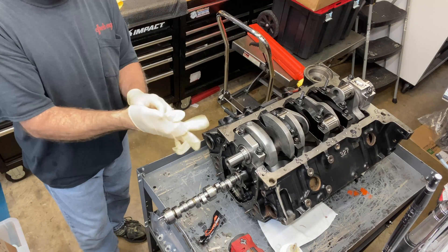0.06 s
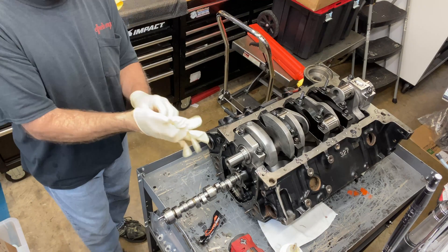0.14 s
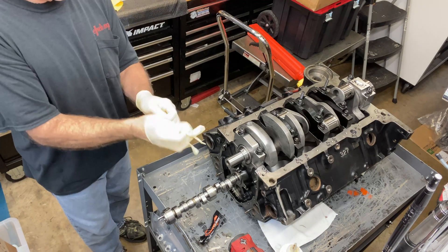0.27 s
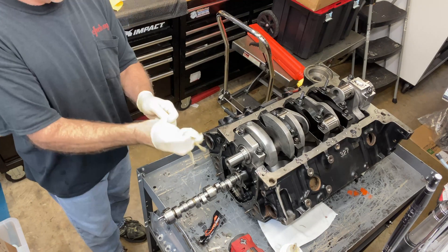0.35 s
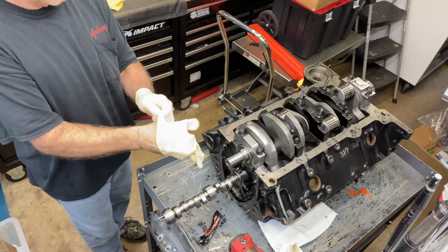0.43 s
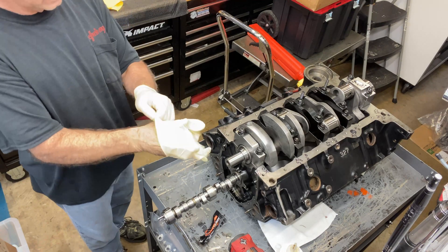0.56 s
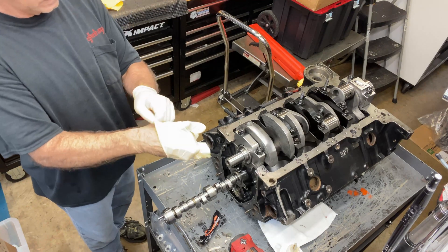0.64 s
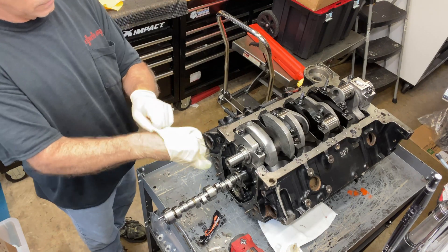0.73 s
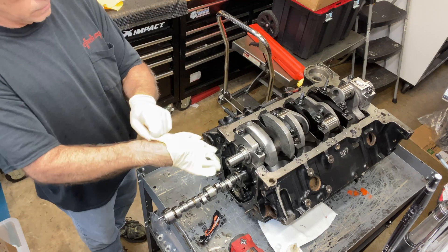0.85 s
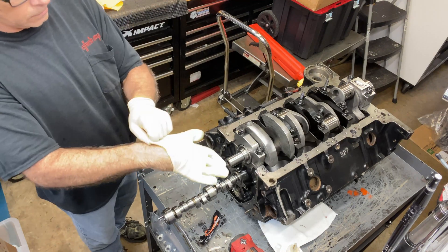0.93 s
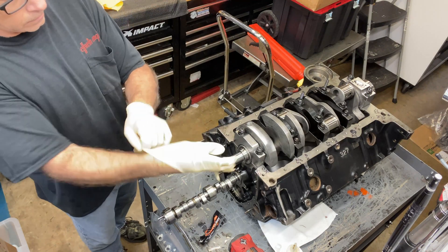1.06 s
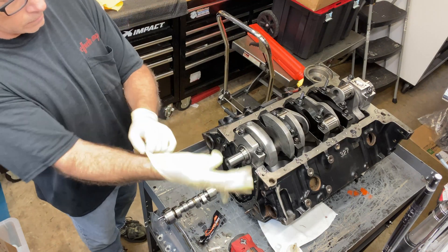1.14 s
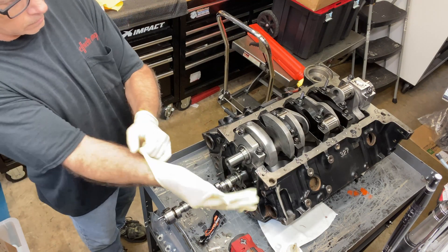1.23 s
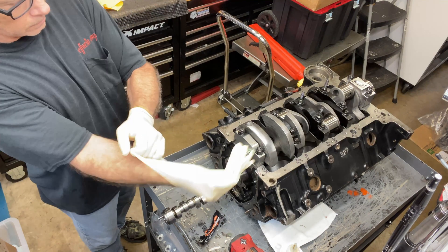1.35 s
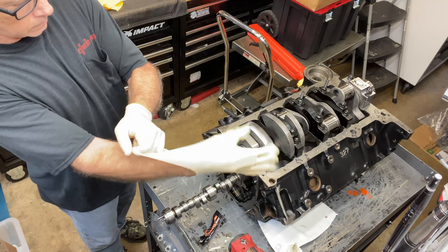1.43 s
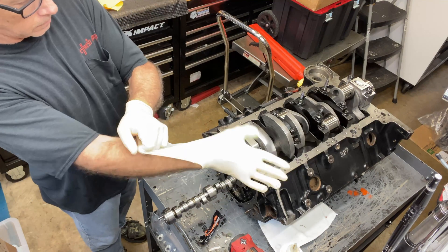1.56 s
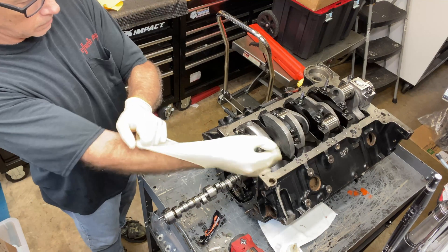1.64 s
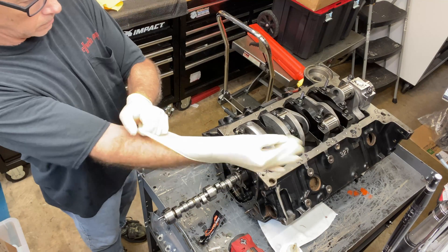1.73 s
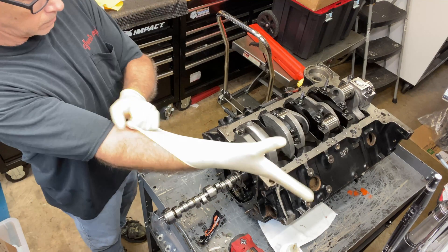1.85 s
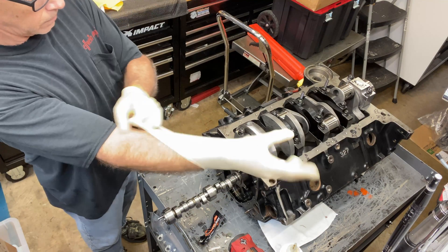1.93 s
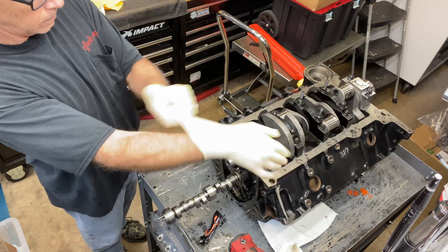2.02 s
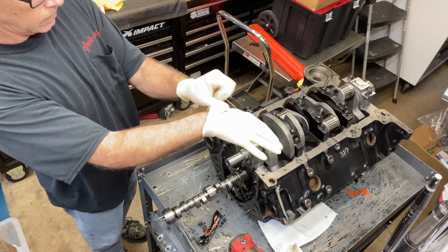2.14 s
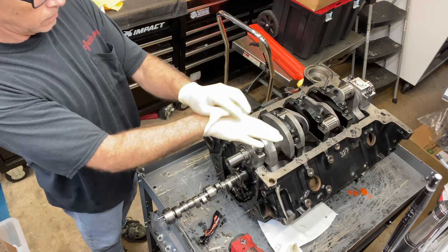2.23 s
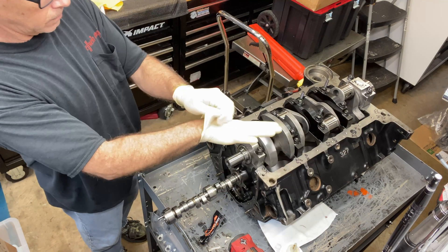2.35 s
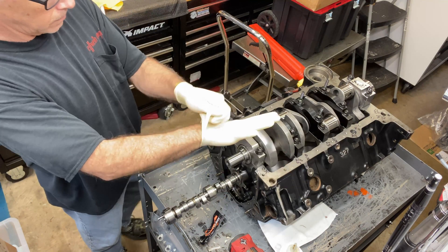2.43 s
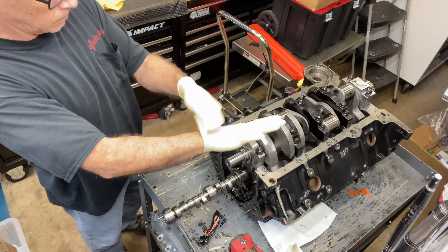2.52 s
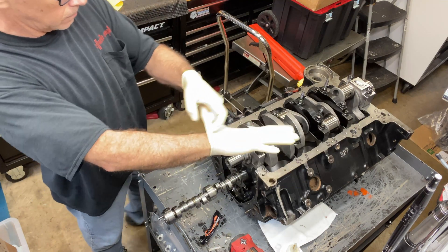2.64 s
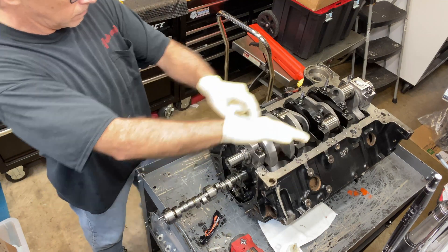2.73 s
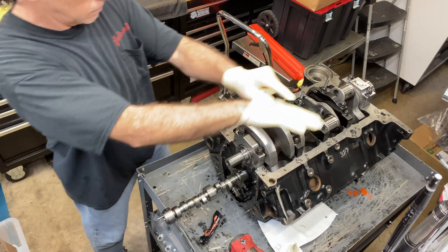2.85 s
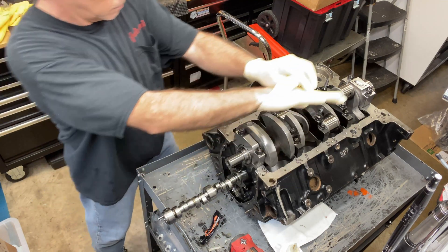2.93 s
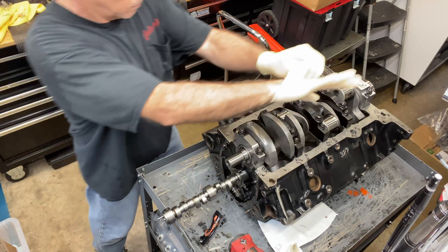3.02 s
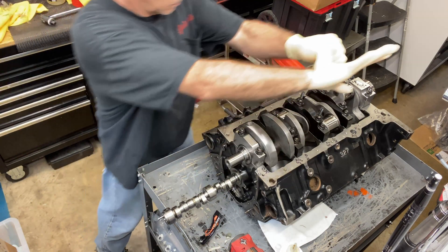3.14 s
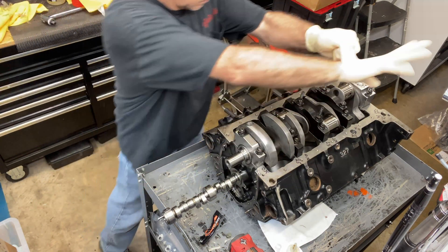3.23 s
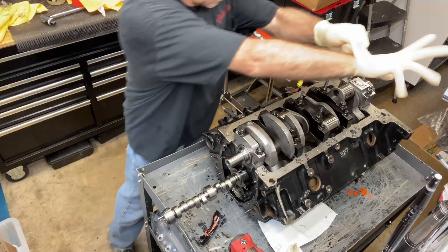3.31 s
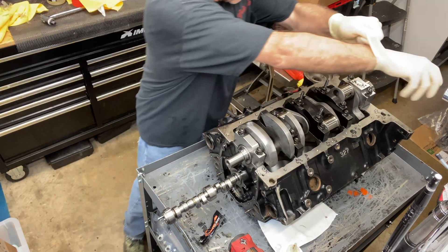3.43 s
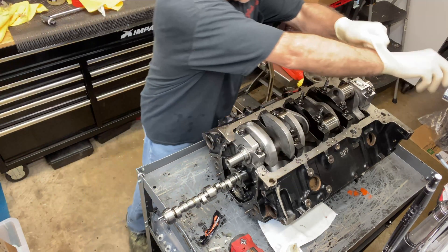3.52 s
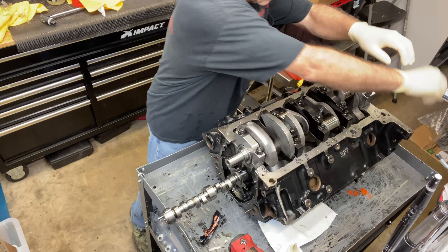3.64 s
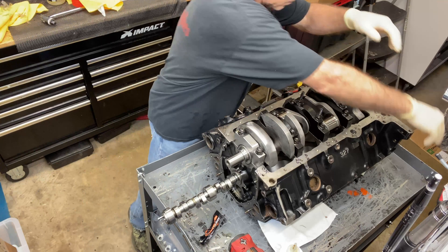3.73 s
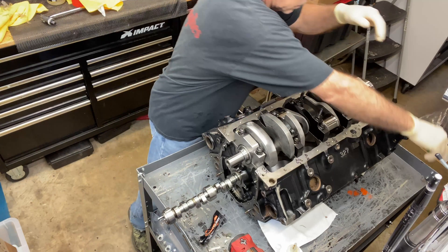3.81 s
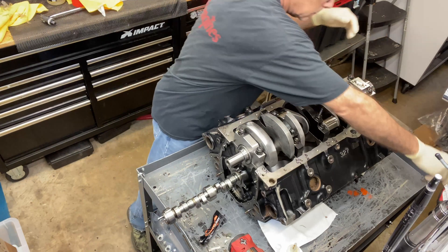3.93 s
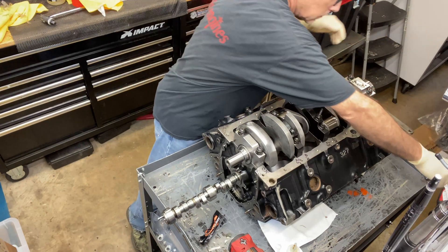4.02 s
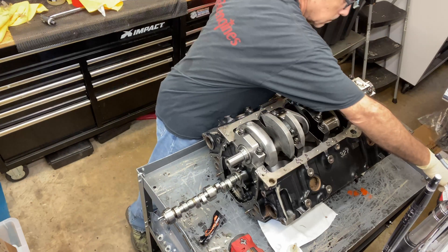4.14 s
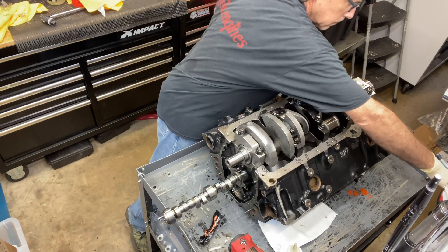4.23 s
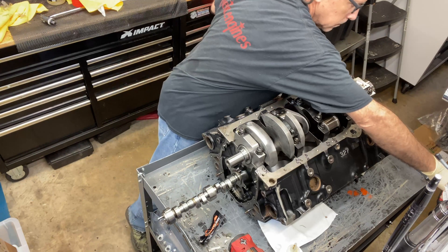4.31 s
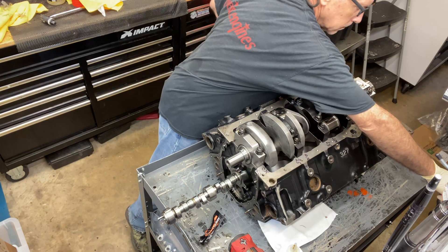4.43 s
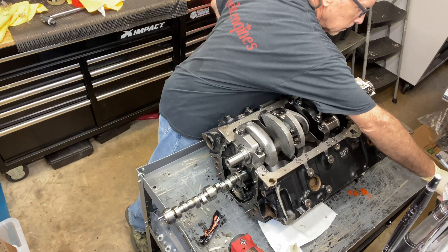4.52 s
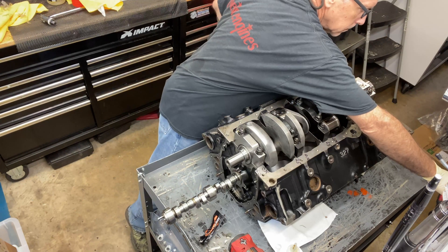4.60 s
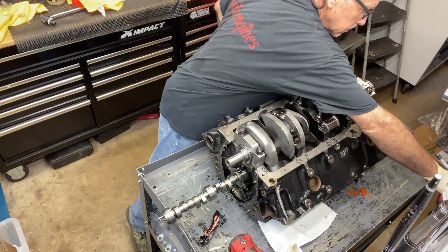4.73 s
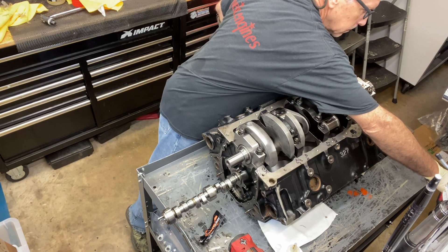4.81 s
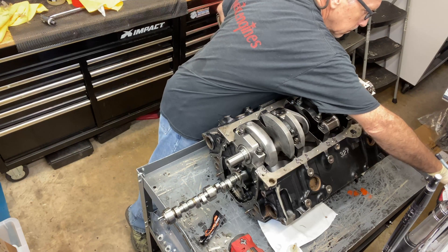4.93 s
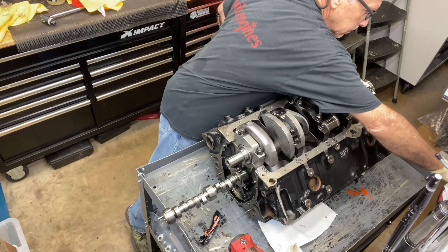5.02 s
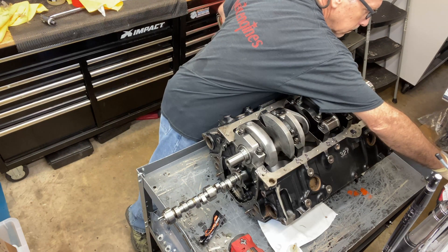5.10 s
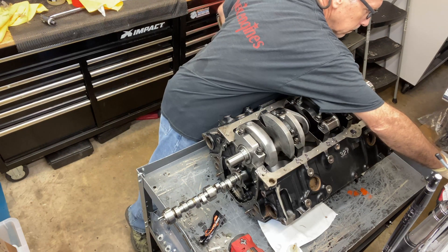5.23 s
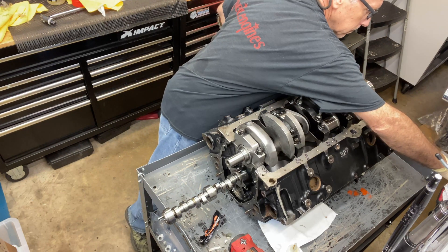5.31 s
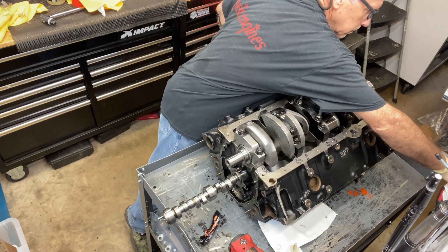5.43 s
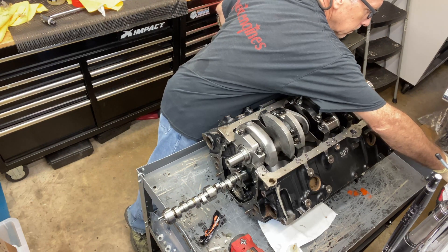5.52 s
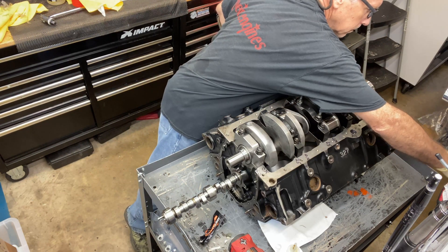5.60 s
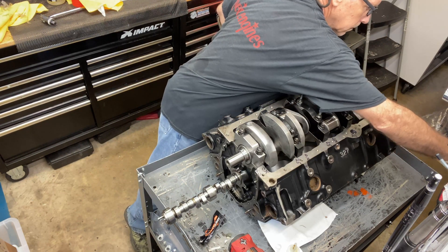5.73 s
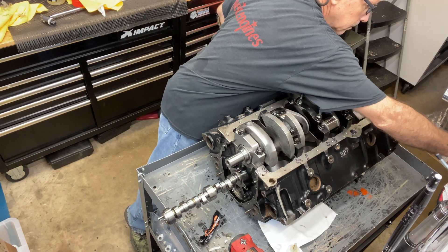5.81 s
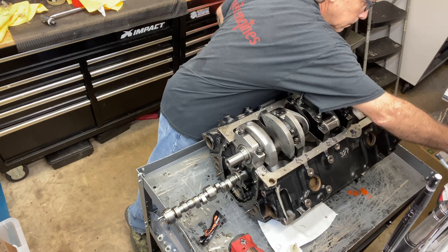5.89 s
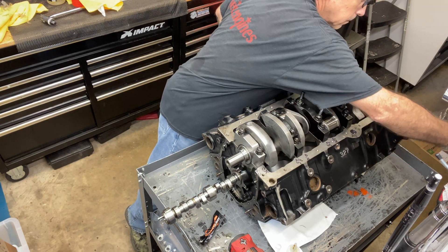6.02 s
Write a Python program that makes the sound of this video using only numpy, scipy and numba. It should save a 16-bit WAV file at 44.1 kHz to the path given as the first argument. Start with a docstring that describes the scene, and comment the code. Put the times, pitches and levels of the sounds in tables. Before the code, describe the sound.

In a small workshop, a latex glove is worked onto a hand close to the microphone: dry rustling, quick fluttering pulls with rubbery rasps, then loud snaps against skin. After the last crisp snap it goes nearly quiet, leaving a low motor hum. Slightly further off, clothes brush softly and parts are shifted with dull bumps, a knock and faint metal ringing.

```python
"""In a small workshop a latex glove is worked onto a hand. Random slips make the film rustle, rasp and squeak.
Falling resonances make it flutter as it is stretched; short noise bursts make it snap on the skin.
Then parts are shifted on a shelf a little further off: noise knocks with light metal rings and dull bumps.
Filtered noise gives the brushing clothes and the room air; under it all a machine hums in three low tones."""
import sys
import numpy as np
from scipy import signal
from scipy.fft import rfft, irfft, next_fast_len
from scipy.io import wavfile
from numba import njit

SR = 44100
rng = np.random.default_rng(int(sys.argv[2]) if len(sys.argv) > 2 else 0)


def unload_audio(sound):
    """Save the sound as a 16-bit wav file, at the path given as the first command line argument."""
    columns = np.transpose(np.atleast_2d(sound))
    # keep every value between -1 and 1, then stretch to whole-number steps
    steps = np.round(np.clip(columns, -1, 1) * 32767)
    wavfile.write(sys.argv[1], SR, steps.astype(np.int16))


N = 267246  # length in samples
T = np.arange(N) / SR  # time in seconds
TOP_HZ = 16300  # upper edge of the whole sound

# All levels in dB are relative settings, ahead of the final mix.
# Pulls on the cuff. Each row: time of full strength in seconds, length in seconds, flutter level in dB,
# rasp level in dB, rub level in dB, swell over the pull in dB, pitch at that time in Hz,
# rise time of the flutter in seconds.
PULLS = [(1.097, 0.088, -26, -60, -39, 7, 460, .055), (1.2685, 0.069, -28.5, -29.5, -40.5, 5.5, 500, .01),
         (1.431, 0.057, -28, -37.5, -46.5, 0, 330.3, .02),
         (1.573, 0.095, -32.5, -37, -39.5, 7.5, 521.2, 0.01013),
         (1.761, 0.1, -40, -45, -46.5, -1, 399, 0.047)]
PULL_RELEASE_S = 0.03


def undb(db):
    """Turn decibels into a gain."""
    return 10 ** (np.asarray(db) / 20)


def unit(x):
    """Scale a sound to an average (rms) strength of 1."""
    return x / np.sqrt(np.mean(x ** 2))


def at(points, hz):
    """Read a curve of (Hz, value) points on a log-frequency axis."""
    point_hz, value = np.transpose(points)
    return np.interp(np.log(hz + 1), np.log(point_hz), value)


def colour(x, points):
    """Filter a sound with a curve of (Hz, dB) points."""
    n = x.shape[-1]
    size = next_fast_len(n)
    gain = undb(at(points, np.fft.rfftfreq(size, 1 / SR)))
    return irfft(rfft(x, size) * gain, size)[..., :n]


def band(x, lo, hi, order=4):
    """Keep only the frequencies between lo and hi, in Hz."""
    sos = signal.butter(order, [lo, min(hi, SR / 2 - 1)], "band", fs=SR, output="sos")
    return signal.sosfilt(sos, x)


def walk(rate):
    """Chance that wanders: random values, rate of them per second, joined by straight lines."""
    return np.interp(T * rate, np.arange(4096), rng.standard_normal(4096))


def add(track, s, sound):
    """Mix a sound into a track at time s in seconds."""
    i = round(s * SR)
    track[..., i:i + sound.shape[-1]] += sound[..., :track.shape[-1] - i]


def slips(rate, spread_db):
    """Random stick-slip clicks, rate of them per second, a few much larger than the rest."""
    happens = rng.random(N) < rate / SR
    sign = rng.choice([-1, 1], N)
    return happens * sign * undb(spread_db * np.minimum(rng.exponential(size=N), 4))


def gesture(s, length, attack, release, swell_db=0):
    """Loudness of one movement: rises until time s, holds or swells for its length, then dies away."""
    rise = np.clip(1 + (T - s) / attack, 0, 1) ** 2
    swell = undb(swell_db * (np.clip((T - s) / length, 0, 1) - 1.5))
    return rise * swell * np.exp(-np.clip((T - s - length) / release, 0, 20))


@njit
def resonate(x, hz, k):
    """A resonance (state-variable band-pass) with a moving centre in Hz and relative width k."""
    y, b, l = np.empty(len(x)), 0., 0.  # output and the two stored states
    for i in range(len(x)):
        g = np.tan(np.pi * hz[i] / SR)
        v = (b + g * (x[i] - l)) / (1 + g * (g + k))
        b, l, y[i] = 2 * v - b, l + 2 * g * v, k * v
    return y


def burst(levels_db, decay, points, spike, ring_hz=2000, ring_db=-30, attack_s=0.000071):
    """A contact: a sharp touch and fading noise, set in three bands; a broad resonance joins the middle one."""
    edges_hz = [70, 850, 6000, 15000]  # band edges in Hz
    t = T[:SR // 2]
    push = rng.standard_normal(len(t)) * np.exp(-t / decay) * (1 - np.exp(-t / attack_s))
    push[SR // 1000] += spike * np.sqrt(decay * SR)
    # keep the timing (phase) of the push, but give it a smooth spectrum
    phase = np.exp(1j * np.angle(rfft(push)))
    even = phase * undb(at(points, np.fft.rfftfreq(len(t), 1 / SR)))
    crack = irfft(even, len(t)) * np.exp(-(t / (10 * decay)) ** 2)
    ring = resonate(crack + 1e-18, np.full(len(t), 1. * ring_hz), 0.35)
    ringing = crack + undb(ring_db) * ring
    layers = zip(levels_db, (crack, ringing, crack), edges_hz, edges_hz[1:])
    shiver = sum(undb(db) * unit(band(x, lo, hi)) for db, x, lo, hi in layers)
    return shiver * np.sqrt(decay * SR / len(t) / 2)  # a longer decay carries more energy


def room(x, near_db, tail_db, lag_s):
    """Direct sound, right side first; quick scatter from the bench; a short diffuse tail; new echoes each call."""
    # Time to die away by 60 dB. Each row: frequency in Hz, time in seconds.
    t60_curve = [(100, 0.1), (500, 0.22), (1500, 0.28), (4000, 0.35), (9000, 0.25), (15000, 0.15)]
    hz, s, noise = signal.stft(rng.standard_normal((3, SR // 3)), SR)
    shared = np.clip(1 - (hz[:, None] / 650) ** 2, 0, 1)  # long waves reach both sides alike
    field = noise[:2] * np.sqrt(1 - shared) + noise[2] * np.sqrt(shared)
    fading = np.exp(-np.log(1000) * s / at(t60_curve, hz)[:, None])
    tail = signal.istft(field * fading)[1]
    t = T[:tail.shape[1]]
    near = unit(signal.istft(field)[1][:, ::-1] * np.exp(-t / 0.012))
    near = band(near, 180, 8800, order=1)  # arms and clothes soak up the top, so the treble stays crisp
    late = unit(tail * np.clip(t / 0.0055, 0, 1))  # the tail fades in over 5.5 ms
    response = (undb(near_db) * near + undb(tail_db) * late) / np.sqrt(len(t))
    direct = np.array([np.pad(x, (round(abs(lag_s) * SR), 0))[:len(x)], x])
    echoes = signal.fftconvolve(x[None], response, axes=1)[:, :len(x)]
    return (direct + echoes) / np.sqrt(1 + undb(2 * near_db) + undb(2 * tail_db))


def moving(x, size=8192):
    """A moving source fades from one place in the room to the next, each with its own echoes."""
    out, window = np.zeros((2, N + size)), signal.windows.hann(size)
    x = np.pad(x, (size // 2, size))
    for i in range(0, N, size // 2):
        piece = np.pad(x[i:i + size] * window, (0, SR // 4))  # space for the echoes to ring out
        add(out, i / SR, room(piece, near_db=-5, tail_db=-6, lag_s=.0001))
    return out[:, size // 2:][:, :N]


def rustle():
    """Tiny slips of latex on skin over a smooth sliding hiss, raised by every stroke and pull."""
    # Colour of the rub. Each row: frequency in Hz, level in dB.
    rub_colour = [(300, -0.5), (450, 4), (900, -5.5), (1600, -0.5), (2600, -1), (4500, -6), (6500, -19),
                  (12500, -30), (15000, -32.5)]
    # Strokes of the fingers over the film. Each row: time of full strength in seconds, length in seconds,
    # level in dB, treble in dB relative to it.
    strokes = [(0, 0.0033, -41.5, 1.5), (.07, 0.11, -49, -7), (.3, 0.029, -48, -4), (.42, 0.096, -46, -6),
               (.68, 0.13, -55, -9), (.93, 0.13, -53.5, -2.5), (1.37, 0.087, -42.5, -7.5),
               (2.0, 0.029, -50.5, 3.5), (2.355, 0.0062, -59, 6.5), (2.79, 0.22, -56.5, -7),
               (3.205, 0.066, -49, -4.5), (3.38, 0.51, -68.5, -2), (4.43, 0.11, -64.5, -18),
               (4.99, 0.27, -70, -17), (5.86, .2, -62, -5)]
    # Light contact between strokes. Each row: start of full strength in seconds, length in seconds.
    handling = [(0, 2.21), (2.38, 1.22)]
    handling_db, handling_treble_db = -55, 1
    stroke_attack_s, stroke_release_s, pull_attack_s = 0.1, 0.014, 0.036

    grain = unit(slips(rate=760, spread_db=2.5)) + 1.0 * rng.standard_normal(N)
    # small folds that pop as the film is rubbed
    crinkle = unit(band(slips(rate=170, spread_db=4.5), 1800, 6200, order=1))
    film = colour(grain * undb(2.0 * walk(70)) + undb(-7) * crinkle, rub_colour)
    body, treble = unit(band(film, 220, 6000)), unit(band(film, 6000, TOP_HZ))

    def rub(db, treble_db):
        return undb(db) * (body + undb(treble_db) * treble)

    out = np.zeros(N)
    for s, length, db, treble_db in strokes + [(*row, handling_db, handling_treble_db) for row in handling]:
        out += rub(db, treble_db) * gesture(s, length, stroke_attack_s, stroke_release_s)
    for s, length, _, _, db, swell_db, *_ in PULLS:
        out += rub(db, treble_db=-1.0) * gesture(s, length, pull_attack_s, PULL_RELEASE_S, swell_db)
    return out


def flutter():
    """Stretched film judders over the knuckles, partly regularly; its lowest membrane modes fall at each pull."""
    # the pitch falls as the hand slides in, down to that of the slack film
    sag_octaves_per_s, slack_hz = 6.5, 195.7
    tone_db, jitter = -4, 0.17  # the regular part of the judder and the scatter of its cycles
    judder = unit(slips(rate=880, spread_db=2.0)) + 0.22 * rng.standard_normal(N)
    hz, effort = np.full(N, 1. * slack_hz), 0
    for s, length, db, _, _, swell_db, pitch, rise in PULLS:
        sag = 2 ** (-sag_octaves_per_s * (T - s))
        hz = np.where(T > s - rise, np.maximum(pitch * sag, slack_hz), hz)
        effort = effort + undb(db) * gesture(s, length, rise, PULL_RELEASE_S, swell_db)
    film = 0
    for ratio, db in [(1, 30.5), (1.6, -5.5), (2.3, -22)]:  # mode as a multiple of the pitch, level in dB
        mode = resonate(resonate(judder, hz * ratio, 0.95), hz * ratio, 0.95)
        film = film + undb(db) * mode
    cycles = np.cumsum(hz * (1 + jitter * walk(300))) / SR
    tone = np.sin(2 * np.pi * cycles) * undb(1.6 * walk(90))
    return unit(unit(film / np.sqrt(hz)) + undb(tone_db) * unit(tone)) * effort


def rasp():
    """Taut latex breaks loose at each pull: an uneven train of slips, with a finer grain between them."""
    slip_hz, jitter, scatter_db, fine_grain_db, attack_s = 129.8, .35, 5.5, -4.5, .004
    gap, size = rng.standard_normal((N // 20, 2)).T
    when = np.cumsum(np.exp(jitter * gap)) * SR / slip_hz
    train = np.bincount(np.minimum(when, N).astype(int), undb(scatter_db * size), N)[:N]
    grain = unit(train) + undb(fine_grain_db) * unit(slips(rate=2100, spread_db=2.5))
    sound = colour(grain, [(300, -16.5), (650, 0.5), (2000, 5.5), (3000, 2.0), (4200, -5.5), (9000, -23)])
    effort = sum(undb(db) * gesture(s, length, attack_s, PULL_RELEASE_S) for s, length, _, db, *_ in PULLS)
    return unit(sound) * effort


def snaps():
    """Pinched film slips from the fingers and slaps the skin, trapping a pocket of air."""
    # Snaps and plucks. Each row: start in seconds, body level in dB, crack level in dB, treble level in dB,
    # decay in seconds, pitch of the slap in Hz.
    snap_rows = [(0.271, -37, -31, -55, 0.00099, 1500), (0.575, -32.5, -32, -44.5, 0.0091, 1520),
                 (1.341, -16.5, -23, -44, 0.0014, 2060), (1.4069, -30, -16, -18.5, 0.00046, 5200),
                 (1.666, -23, -25.5, -33, 0.0049, 2200), (1.819, -17, -26.5, -37, 0.0048, 1200),
                 (1.856, -26, -33, -40, 0.0054, 1100), (2.082, -44.5, -41, -32, 0.016, 4000),
                 (2.103, -14.5, -16, -17.5, 0.0058, 920), (2.1367, -22, -13.5, -16, 0.0012, 2720),
                 (2.214, -59, -24.5, -35, 0.00072, 2470), (2.434, -60, -29.5, -35, 0.0024, 4450),
                 (2.4984, -54, -29, -31.5, 0.002, 2700), (2.5293, -27, -14, -11.5, 0.00078, 2030),
                 (2.6077, -24.5, -14, -16, 0.00082, 1020), (2.8534, -62, -52, -22, 0.00079, 5000),
                 (2.8697, -58, -32, -18.5, 0.00065, 5000), (2.8982, -18.5, -12.5, -18, 0.002, 3020),
                 (3.046, -32, -27.5, -33, 0.0013, 2520), (3.229, -28, -32.5, -56, 0.0032, 1410),
                 (3.6156, -28, -24, -23.5, 0.0089, 3360), (3.6294, -27.5, -15, -30, 0.0027, 3820),
                 (3.6333, -18, -11.5, -15, 0.006, 3560)]
    # Colour of a snap. Each row: frequency in Hz, level in dB.
    snap_colour = [(100, -23.5), (220, -0.5), (400, -4.5), (680, -2), (850, -8.5), (1300, -5), (2000, 3),
                   (3200, 1.5), (5500, -1), (11000, -2), (14500, -7)]
    # Lag of the left side: near zero for early snaps, longer for later ones.
    # Each row: time in seconds, lag in seconds.
    left_lag = [(2.2, .00005), (2.5, .00062)]
    dry_below_s = 0.001  # the briefer a tick is than this, the less it stirs the room
    out = np.zeros((2, N))
    for s, *levels_db, decay, hz in snap_rows:
        slap = burst(levels_db, decay, snap_colour, spike=.2, ring_hz=hz, ring_db=5)
        room_db = 10 * np.log10(min(decay / dry_below_s, 1))
        lag_s = np.interp(s, *np.transpose(left_lag))
        add(out, s, room(slap, near_db=room_db + 2.5, tail_db=room_db - 3.5, lag_s=lag_s))
    return out


def jerks():
    """Taut film jerks over the knuckles: each time a click and a few cycles of the film's own tone."""
    # The loudest jerks. Each row: start in seconds, pitch in Hz, level in dB.
    jerk_rows = [(1.2721, 2040, -10), (1.287, 2310, -17), (1.308, 2900, -14.5), (1.322, 2080, -23),
                 (1.334, 2190, -19), (1.576, 1950, -30), (1.603, 1940, -32), (1.87, 2870, -30)]
    decay_s, click_db = 0.0018, -8
    out, t = np.zeros(N), T[:SR // 20]
    for s, hz, db in jerk_rows:
        click = undb(click_db) * rng.standard_normal(len(t)) * np.exp(-t / 0.00023)
        tone = np.sin(2 * np.pi * hz * t) * np.exp(-t / decay_s)
        add(out, s, undb(db) * (tone + click))
    return room(out, near_db=-2.0, tail_db=-6, lag_s=.0001)


def wobbles():
    """The freed cuff rings against the wrist, with a short overtone; its pitch sags as the tension goes."""
    # Each row: start in seconds, pitch it settles to in Hz, level in dB, decay in seconds.
    wobble_rows = [(0.579, 195, -37, 0.018), (1.438, 198, -22.5, 0.021), (1.472, 184.5, -22, 0.029),
                   (1.822, 163, -22, 0.023), (2.1057, 224, -17, 0.014), (2.144, 228, -17, 0.013),
                   (3.058, 184, -35.5, 0.032)]
    overtone_ratio, overtone_db, overtone_decay_s = 2.8, -12, 0.011
    out, t = np.zeros(N), T[:SR // 3]
    for s, pitch, db, decay in wobble_rows:
        sagging_hz = pitch * (1 + 0.08 * np.exp(-t / 0.0166))
        phase = 2 * np.pi * np.cumsum(sagging_hz) / SR
        overtone = undb(overtone_db) * np.sin(overtone_ratio * phase) * np.exp(-t / overtone_decay_s)
        add(out, s, undb(db) * (np.sin(phase) * np.exp(-t / decay) + overtone))
    return out


def squeaks():
    """The glove drags faintly on skin and metal and sings a wavering, gliding note."""
    # Each row: time of full strength in seconds, length in seconds, pitch at that time in Hz,
    # glide in octaves per second, level in dB.
    squeak_rows = [(0.282, 0.031, 1620, -3, -49), (4.441, 0.076, 9800, 2, -70),
                   (4.889, 0.019, 1024, -3.5, -56), (5.198, .016, 3820, 1.5, -53.5)]
    attack_s, release_s = 0.017, 0.012
    out, waver = 0, 1 + .024 * walk(600)
    for s, length, hz, glide, db in squeak_rows:
        pitch = hz * waver * 2 ** (glide * np.clip(T - s, -attack_s, length + release_s))
        note = np.sin(2 * np.pi * np.cumsum(pitch) / SR)
        out = out + undb(db) * note * gesture(s, length, attack_s, release_s)
    return out


def tray(x):
    """The steel tray under the hands rings in sympathy at its narrow resonances."""
    # Each row: frequency in Hz, width in Hz, level in dB.
    tray_modes = [(398, 48, -3), (590, 16, -3), (990, 34, 0)]

    def ring(side):
        return sum(undb(db) * resonate(side, np.full(N, 1. * hz), width / hz) for hz, width, db in tray_modes)

    return x + np.array([ring(side) for side in x])


def parts():
    """Parts bump on the shelf; each contact rings the metal with a new mix of its modes."""
    # Each row: start in seconds, thud level in dB, clack level in dB, tick level in dB, metal ring level in dB.
    part_rows = [(5.288, -66, -50, -60, -56), (5.396, -38, -35.5, -75, -58),
                 (5.411, -36.5, -35.5, -61, -54), (5.557, -74, -44, -64, -49.5),
                 (5.612, -31, -23.5, -27.5, -58), (5.624, -28, -21.5, -56, -50),
                 (5.644, -22, -36, -51, -43), (5.843, -40, -40, -59, -47.5), (5.889, -56, -48, -58, -45.5),
                 (6.002, -56, -49, -53.5, -47)]
    # Ringing modes of the metal. Each row: frequency in Hz, level in dB, time to die by 60 dB in seconds.
    part_modes = [(2450, 5, 0.066), (2724, 6.5, 0.11), (3830, -3, 0.053), (4640, -8, 0.026),
                  (5100, 5.5, 0.067), (8400, -2, .12), (11600, -1, 0.16), (13300, 1, 0.11)]
    # Colour of a knock. Each row: frequency in Hz, level in dB.
    knock_colour = [(80, 2), (200, 9), (450, 6), (800, -3.5), (1300, -3.5), (2200, -7.5), (4000, -15),
                    (6000, -17), (10000, -7), (13000, -22), (15000, -8)]
    out, t = np.zeros((2, N)), T[:SR // 2]
    hz, mode_db, t60 = np.transpose(part_modes)[:, :, None]
    for s, *levels_db, ring_db in part_rows:
        # loose parts keep chattering, which roughens the ring of the lower modes most
        chatter = 1300 / hz * np.cumsum(rng.standard_normal((len(hz), len(t))), axis=1)
        share = undb(mode_db + 2 * rng.standard_normal(hz.shape))
        modes = share * np.sin(2 * np.pi * hz * t + chatter) * np.exp(-np.log(1000) * t / t60)
        ring = undb(ring_db) * modes.sum(axis=0) / np.sqrt(len(hz))
        knock = burst(levels_db, 0.0063, knock_colour, spike=0.2, ring_db=-6, attack_s=0.0011)
        add(out, s, room(knock + ring, near_db=1.5, tail_db=3.0, lag_s=0.00029))
    return out


def bumps():
    """Something blunt bumps the shelf: a boom, a hollow knock and a rough clack, coloured by where it touches."""
    # Each row: start in seconds, boom level in dB, knock level in dB, clack pitch in Hz, clack level in dB.
    bump_rows = [(4.607, -47, -46, 1000, -49.5), (4.981, -60, -52, 1240, -53),
                 (5.046, -46, -46.5, 1020, -49.5), (5.144, -32.5, -44.5, 1720, -51.5),
                 (5.502, -38, -52, 1310, -43.5), (5.735, -36.5, -34.5, 1330, -40),
                 (5.951, -42, -43, 1390, -41), (5.978, -37, -44, 910, -42)]
    boom_hz, boom_decay_s = 205.5, 0.022
    knock_hz, knock_decay_s, clack_decay_s = 511, 0.0092, 0.0078
    out, t = np.zeros((2, N)), T[:SR // 2]

    def mode(hz, db, decay):
        return undb(db) * np.sin(2 * np.pi * hz * t) * np.exp(-t / decay)

    for s, boom_db, knock_db, clack_hz, clack_db in bump_rows:
        rough = unit(resonate(rng.standard_normal(len(t)), np.full(len(t), 1. * clack_hz), 0.2))
        clack = undb(clack_db) * rough * np.exp(-t / clack_decay_s)
        bump = mode(boom_hz, boom_db, boom_decay_s) + mode(knock_hz, knock_db, knock_decay_s) + clack
        add(out, s, room(bump, near_db=0, tail_db=-0.5, lag_s=0.00044))
    return out


def cloth():
    """Soft, dull brushing as the body leans over the bench, with grainy scuffs where the hand drags."""
    # Each row: time of full strength in seconds, length in seconds, cloth level in dB, scuff level in dB.
    brush_rows = [(4.598, 0.057, -58.5, -55), (4.982, 0.2, -53, -54.5), (5.477, .047, -56, -44.5),
                  (5.7, 0.017, -43, -41.5), (5.87, 0.049, -51.5, -54)]
    # Colours of cloth and scuff. Each row: frequency in Hz, level in dB.
    cloth_colour = [(40, -24), (85, 23), (130, -9), (220, 18), (340, 1), (800, -5.5), (1300, -22),
                    (2000, -22), (4000, -42), (10000, -55)]
    scuff_colour = [(300, 4.5), (700, -5), (1250, -4.5), (1800, -17.5), (4000, -23), (10000, -41)]
    attack_s, release_s = 0.025, 0.064
    brush = colour(rng.standard_normal(N) * undb(5.4 * walk(55)), cloth_colour)
    brush = brush / np.std(band(brush, 290, 8000))
    scuff = unit(colour(slips(rate=760, spread_db=2.5), scuff_colour))
    out = np.zeros(N)
    for s, length, db, scuff_db in brush_rows:
        out += (undb(db) * brush + undb(scuff_db) * scuff) * gesture(s, length, attack_s, release_s)
    return out


def machine():
    """A motor hum of almost steady tones in softly wavering room noise."""
    # Tones of the hum. Each row: frequency in Hz, level in dB.
    hum_tones = [(72, -48), (144, -54.5), (179, -57)]
    # Colour of the room noise. Each row: frequency in Hz, level in dB per Hz.
    air_colour = [(25, -41), (50, -18), (75, -12), (105, -20), (150, -21), (220, -17.5), (290, -30),
                  (600, -36), (1100, -40), (2000, -50.5), (4200, -58.5), (7000, -63.5), (15000, -77.5)]
    mid, side = colour(rng.standard_normal((2, N)), air_colour)
    wide = band(side, 300, 15000, order=1) * np.array([[1], [-1]])  # opposite on the two sides
    air = (mid + wide) / np.std(band(mid, 216, 6700))
    out = air * undb(-55 + 0.63 * walk(12))
    for hz, db in hum_tones:
        level = undb(db + 1.0 * walk(5.1)) * np.sqrt(2)
        out = out + level * np.sin(2 * np.pi * hz * T + 0.17 * walk(9.7))
    return out


def scene():
    """The glove close by, the shelf further off, the machine under it all."""
    rubbing = rustle() * undb(2.0) + rasp() * undb(-3) + flutter() * undb(1.5) + cloth() + squeaks()
    close = tray(moving(rubbing) + jerks() + snaps() * undb(0.5))
    shelf = parts() * undb(2) + bumps() * undb(3)
    return close + shelf + wobbles() + machine()


def record(dry):
    """Stereo image: wide in the middle range; both sides share one treble, its top slightly late on the right."""
    size = next_fast_len(N + SR // 10)
    hz = np.fft.rfftfreq(size, 1 / SR)
    left, right = rfft(dry, size)
    turn = np.pi / 2 * np.clip((hz - 5200) / 1400, 0, 1)  # the right side takes over the left side's treble
    late = np.exp(-2j * np.pi * np.maximum(hz - 9000, 0) * 80e-6)
    right = np.cos(turn) * right + np.sin(turn) * left * late
    # left against right: frequency in Hz, difference in dB
    balance = [(150, 1.5), (380, -3.5), (650, -7.0), (1200, 3), (2400, 0.0), (4400, 2.5), (8000, -1.26)]
    balance_db = at(balance, hz)
    sides = np.array([left * undb(balance_db / 2), right * undb(-balance_db / 2)])
    sides = irfft(sides, size)[:, :N]
    # a cut around 6 to 7.5 kHz keeps the treble even where the sides cross over; the very top fades
    sides = colour(sides, [(5000, -0.5), (6200, -5.0), (7500, -4.0), (14200, 2.5), (15500, -7)])
    return signal.sosfilt(signal.ellip(8, .2, 70, TOP_HZ, fs=SR, output="sos"), sides)


dry = scene()
out = record(dry)
unload_audio(out)
```